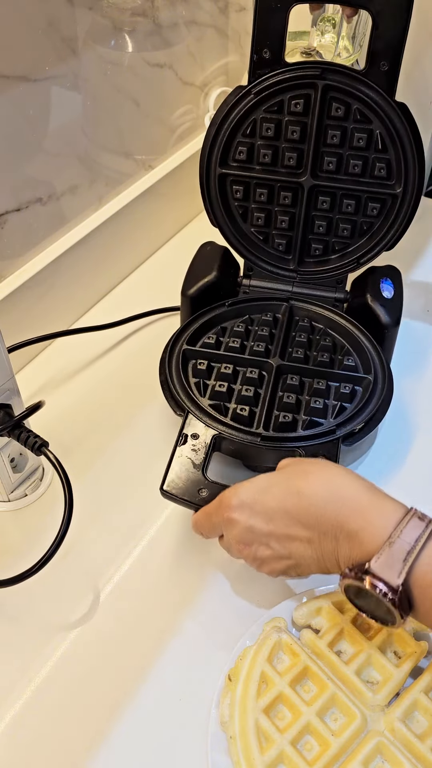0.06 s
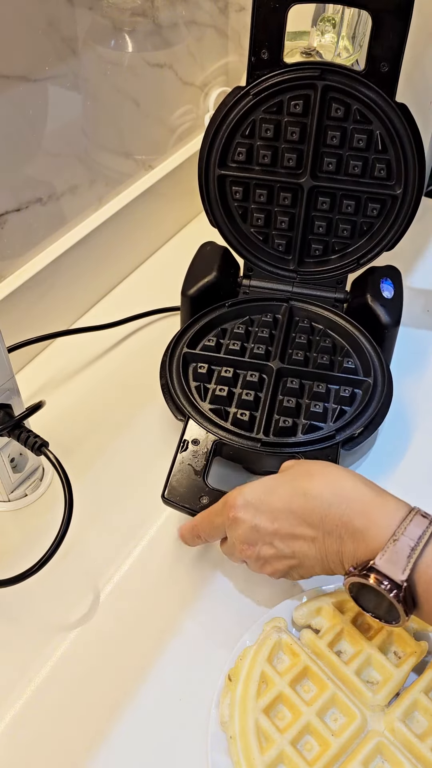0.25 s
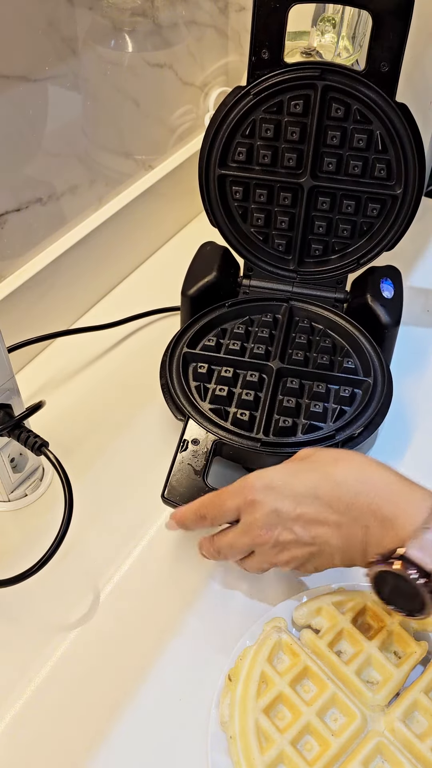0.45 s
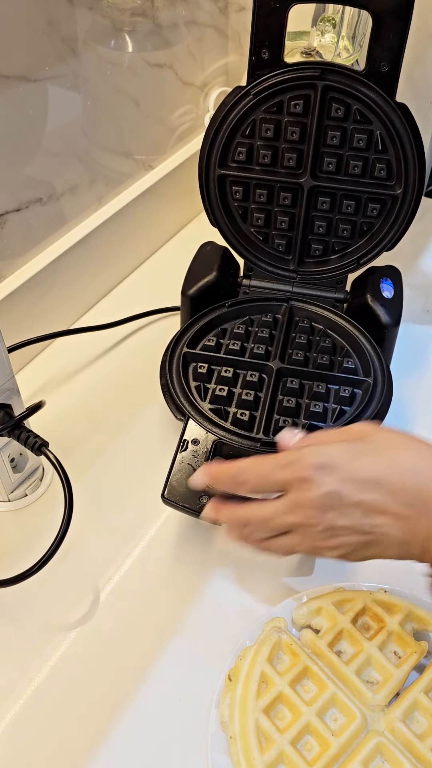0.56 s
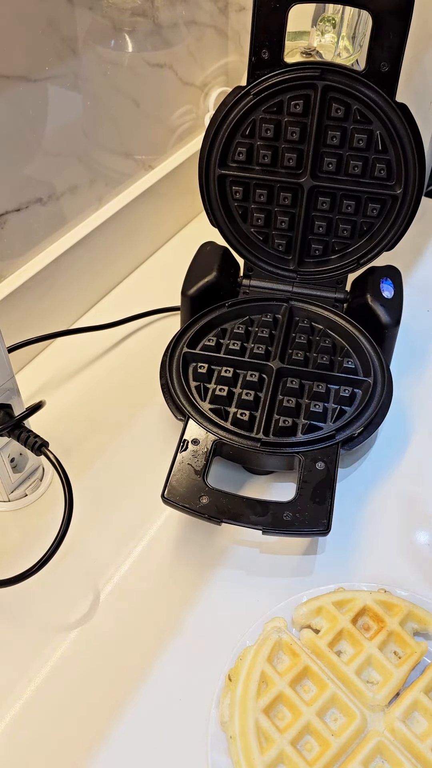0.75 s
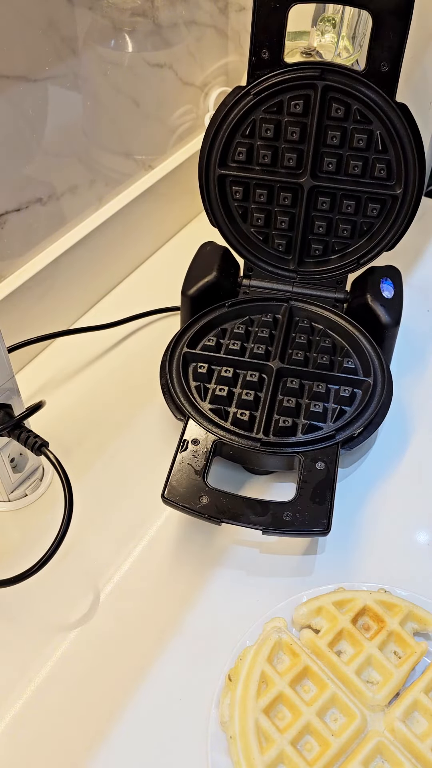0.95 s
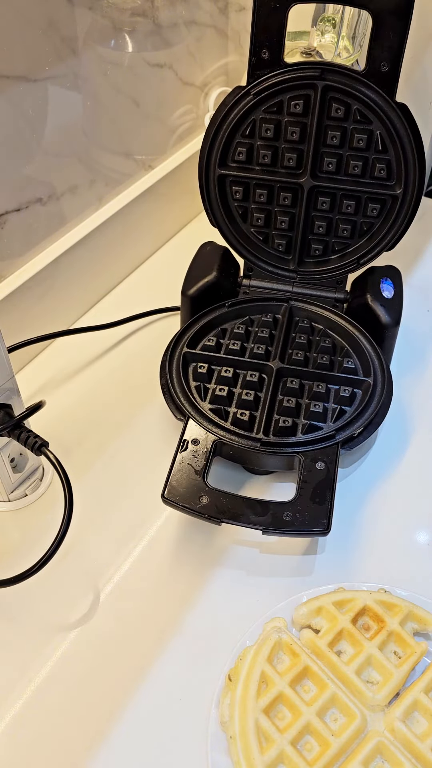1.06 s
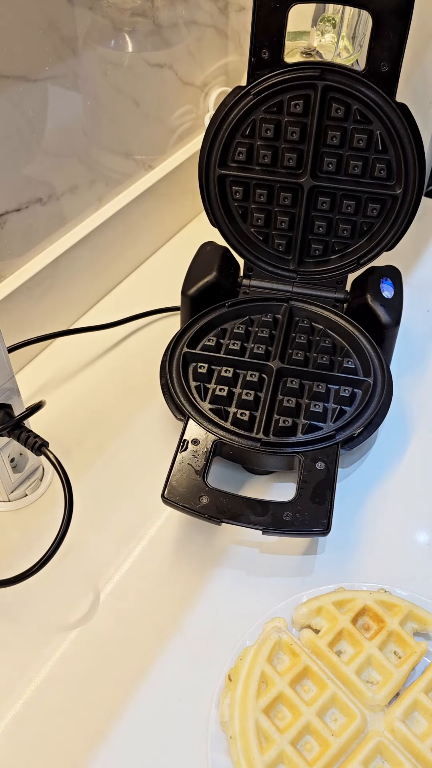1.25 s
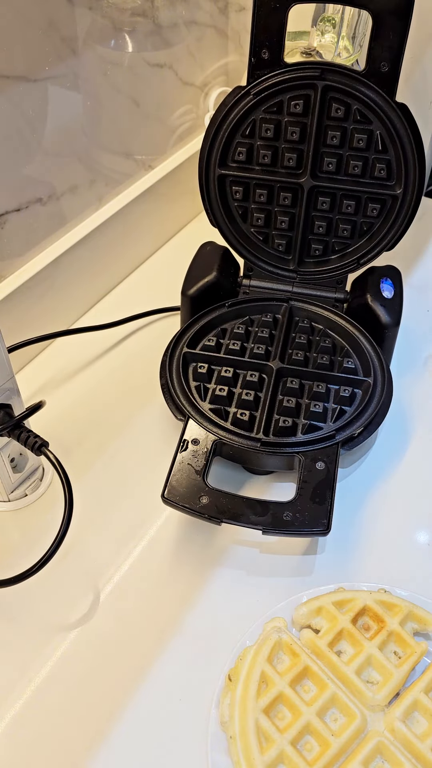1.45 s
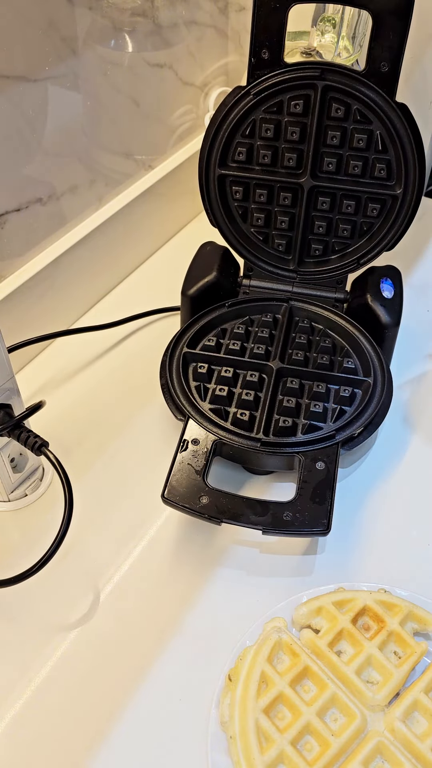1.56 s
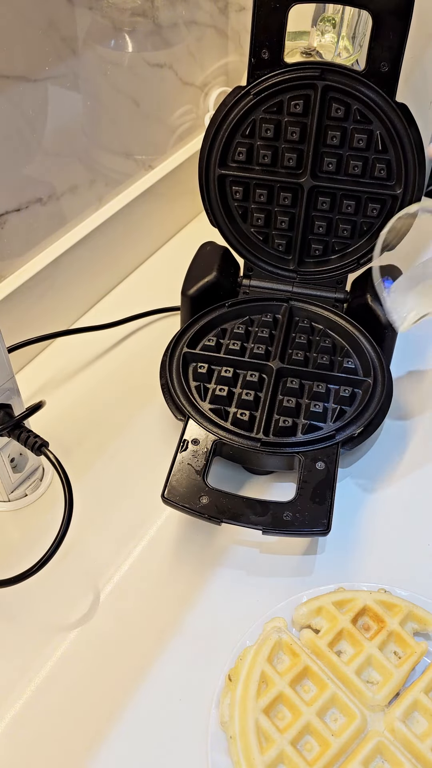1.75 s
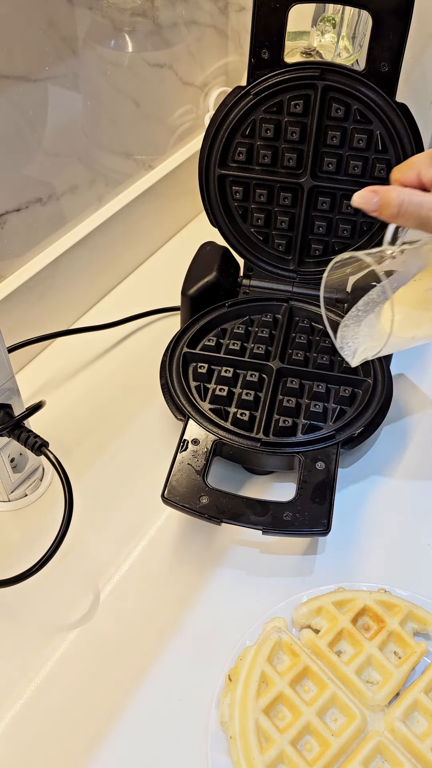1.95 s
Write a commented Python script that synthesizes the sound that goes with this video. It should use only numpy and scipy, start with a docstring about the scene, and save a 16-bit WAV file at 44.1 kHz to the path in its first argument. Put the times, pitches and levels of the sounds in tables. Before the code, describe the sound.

A waffle maker turns against its stop with one loud plastic clunk, then its handle snaps and settles in softer clicks; faint scuffs and squeaks follow over low hum in a small hard kitchen, closely miked.

```python
"""A low hum and room tone run throughout a small hard kitchen. An open waffle maker is knocked, its handle clicks,
then it is turned against its stop with a loud plastic clunk: low housing modes, short stop rings and noise cracks.
The handle clicks again and settles: snaps of noise with short damped modes. Dull bumps lie under the whole scene.
Afterwards something is scuffed along the counter (grainy noise) and squeaks faintly (narrow noise bands)."""
import sys
import numpy as np
from scipy import signal
from scipy.fft import rfft, irfft
from scipy.io import wavfile

SR = 44100
rng = np.random.default_rng(int(sys.argv[2]) if len(sys.argv) > 2 else 0)


def store_pcm(level_fs):
    """Save levels as 16-bit WAV."""
    pcm = np.round(np.clip(level_fs, -1, 1) * 32767).astype(np.int16)
    wavfile.write(sys.argv[1], SR, np.atleast_2d(pcm).T)


N = 88200
T = np.arange(N) / SR  # time axis, s

# quick run of contacts between plate and stop: [t/s, relative level/dB]
STOP_CONTACTS = [(0.2036, 1.5), (0.2047, -7.5), (0.2062, -3)]
# colour of the crack at the stop: [f/Hz, relative level per Hz/dB]
CRACK_COLOUR = [(300, 8.5), (1000, 2.5), (2400, 0), (3200, -4.5), (6500, -10.5), (9000, -18.5),
                (12000, -25), (16000, -37)]


def from_db(db):
    """Decibels to an amplitude factor."""
    return 10 ** (np.asarray(db) / 20)


def rms_one(x):
    """Scales a sound to rms 1."""
    return x / np.sqrt(np.mean(x ** 2) + 1e-20)


def at_hz(points, hz):
    """Reads a table on a log-frequency axis."""
    f, value = np.transpose(points)
    return np.interp(np.log(hz + 1e-9), np.log(f), value)


def pan(db):
    """Left and right gains that differ by db; positive leans left."""
    return from_db([[db / 2], [-db / 2]])


def delay(x, s):
    """The same sound, s seconds later."""
    return np.interp(T - s, T, x, left=0)


def left_first(x, lag_s):
    """The sound reaches the left microphone first, the right one lag_s later."""
    return np.array([x, delay(x, lag_s)])


def decay(age, t60):
    """Exponential fall by 60 dB in t60 seconds; full level before age 0."""
    return np.exp(-np.log(1000) * np.maximum(age, 0) / t60)


def swell(s, rise, t60):
    """A linear rise from time s and an exponential fall."""
    return np.clip((T - s) / rise, 0, 1) * decay(T - s - rise, t60)


def ring(s, hz, t60):
    """A mode struck at time s: a sine that dies exponentially."""
    age = np.maximum(T - s, 0)
    return np.sin(2 * np.pi * hz * age) * decay(age, t60)


def drift(rate):
    """Slow random wandering with rms 1: white noise through two equal low-pass poles at rate Hz."""
    r = np.exp(-2 * np.pi * rate / SR)
    wander = signal.lfilter([1], [1, -2 * r, r * r], rng.standard_normal(2 * N))
    return rms_one(wander[N:])  # the first half lets the filter settle


def noise(spectrum):
    """Coloured stereo noise, alike in the bass and diffuse in the treble; rms 1."""
    # how alike left and right are: [f/Hz, correlation]
    likeness = [(50, 1), (150, 0.9), (300, 0.77), (600, 0.37), (2000, 0.1), (12000, 0.033)]
    hz = np.arange(N // 2 + 1) * SR / N
    mid, side = rfft(rng.standard_normal((2, N)))
    alike = np.clip(at_hz(likeness, hz), -1, 1)
    both = np.sqrt(1 + alike) * mid + np.sqrt(1 - alike) * side * [[1], [-1]]
    coloured = both * from_db(at_hz(spectrum, hz)) * (hz > 15)
    return rms_one(irfft(coloured, N))


def band(x, low_hz, high_hz):
    """A band-pass made from a second-order Butterworth design."""
    sos = signal.butter(2, [low_hz, min(high_hz, SR / 2 - 1)], "band", fs=SR, output="sos")
    return signal.sosfilt(sos, x)


def room_tone():
    """Steadily coloured noise whose level moves slowly."""
    # colour of the room tone: [f/Hz, relative level per Hz/dB]
    colour = [(20, -2.5), (55, 6), (80, -0.5), (125, -8), (200, -17), (300, -21), (560, -19.5),
              (800, -28.5), (1700, -27.5), (2700, -35), (6500, -41.5), (9300, -46), (11500, -39),
              (16000, -42.5)]
    # its level before panning: [t/s, level/dB]
    level_db = [(0, -40), (.2, -35.5), (.45, -43), (.85, -41), (1.2, -41), (2, -43)]
    return from_db(np.interp(T, *np.transpose(level_db))) * noise(colour) * pan(2.5)


def hum():
    """A low hum of wavering pitch and level, and a steady-pitched upper line that partly follows its level."""
    # level of the low hum: [t/s, level/dB]
    hum_level = [(0, -34), (.2, -37.5), (.3, -66), (.5, -33), (.58, -45), (.64, -31.5), (.76, -38.5),
                 (.85, -33), (1.0, -36), (1.17, -30), (1.36, -28.5), (1.48, -43.5), (1.55, -31.5),
                 (1.65, -52), (1.72, -47), (2, -46.5)]
    low_hz, waver_hz = 46.3, 2.17  # mean pitch and rms pitch waver
    upper_hz, upper_mean_db, upper_waver_db = 118.2, -49, 3
    follows = 0.48  # share of the low hum's dB movement
    low_db = np.interp(T, *np.transpose(hum_level))
    phase = 2 * np.pi * np.cumsum(low_hz + waver_hz * drift(7.8)) / SR
    low = from_db(low_db) * rms_one(np.sin(phase))
    upper_db = upper_mean_db + follows * (low_db - low_db.mean()) + upper_waver_db * drift(24)
    upper = from_db(upper_db) * np.sin(2 * np.pi * upper_hz * T)
    return low + upper


def kitchen(x):
    """Convolves with a noise burst for early reflections off counter and wall, and a tail that dies band by band."""
    # reverberation time: [f/Hz, t60/s]
    room_t60 = [(100, 1), (300, 0.86), (1000, 0.65), (3000, 0.57), (6000, 0.51), (12000, 0.49)]
    # colour of the reflections: [f/Hz, relative level/dB]
    colour = [(100, -6.5), (300, -8), (650, 1), (1000, 0.5), (2000, -3), (3500, -1.5), (7000, -6),
              (14000, -3.5)]
    tail_db, early_db, early_t60_s = -8.5, -8.5, 0.1
    edges = np.geomspace(70, 18000, 13)  # band edges, Hz
    diffuse = noise(colour)
    tail = 0
    for low, high in zip(edges, edges[1:]):
        t60 = at_hz(room_t60, np.sqrt(low * high))
        tail = tail + band(diffuse, low, high) * swell(0.001, 0.0039, t60)
    early = noise(colour) * swell(0.0014, 0.0021, early_t60_s)
    response = from_db(tail_db) * rms_one(tail) + from_db(early_db) * rms_one(early)
    response = response / np.sqrt(N)  # rms 1 becomes energy 1
    return signal.fftconvolve(x, response, axes=1)[:, :N]


def grainy_noise(events, spectrum, grain_db):
    """Noise that swells and dies, roughened by random level changes of grain_db rms."""
    level = sum(from_db(db) * swell(s, rise, t60) for s, db, rise, t60 in events)
    return level * rms_one(from_db(grain_db * drift(120)) * noise(spectrum))


def bumps():
    """Dull handling bumps: dark, grainy noise bursts."""
    # the bumps: [t/s, level/dB, rise/s, t60/s]
    events = [(0.0, -35, 0.00067, 0.32), (0.43, -41.5, 0.005, 0.46), (1.07, -58, 0.01, 0.73),
              (1.222, -44.5, 0.0092, 0.37), (1.46, -56.5, 0.042, 0.28), (1.72, -81, 0.0062, .2),
              (1.93, -70, 0.023, .15)]
    # their colour: [f/Hz, relative level per Hz/dB]
    colour = [(100, 1), (300, 5), (580, 11.5), (900, 1.5), (1800, -6.5), (4000, -17), (16000, -36)]
    return grainy_noise(events, colour, grain_db=-3.5)  # the sign only mirrors the random grain


def scuffs():
    """Friction along the counter: grainy noise strokes."""
    # the scuffs, before panning: [t/s, level/dB, rise/s, t60/s]
    events = [(0.95, -45.5, 0.045, 0.31), (0.988, -42.5, 0.013, 0.37), (1.045, -50.5, 0.011, 0.36)]
    # their colour: [f/Hz, relative level per Hz/dB]
    colour = [(120, 10), (220, 4.5), (480, 1), (720, -3), (900, 3.5), (1300, -3), (3000, -4), (5500, -7),
              (9000, -12), (16000, -14)]
    return grainy_noise(events, colour, grain_db=1.5) * pan(0.5)


def squeaks():
    """Friction drives one narrow resonance for a moment: band-passed noise that holds, then dies."""
    # faint rubs and squeaks: [t/s, time from onset to fall/s, f/Hz, width/Hz, level/dB]
    events = [(0.921, 0.11, 3100, 700, -55), (1.067, 0.035, 940, 160, -55.5),
              (1.125, 0.013, 618, 112, -47.5), (1.527, 0.051, 553, 140, -57),
              (1.714, .06, 4080, 195, -65.5), (1.792, 0.055, 2154, 257, -51),
              (1.842, .02, 9400, 3040, -60.5), (1.886, 0.035, 3650, 710, -63)]
    rise_s, t60_s = 0.0057, 0.51
    out = 0
    for s, length, hz, width, db in events:
        level = np.clip((T - s) / rise_s, 0, 1) * decay(T - s - length, t60_s)
        friction = band(rng.standard_normal((2, N)), hz - width / 2, hz + width / 2)
        out = out + from_db(db) * level * rms_one(friction)
    return out


def handle():
    """Each click is a snap and the handle's damped modes; softer touches lose their treble."""
    # clicks of the plastic handle: [t/s, relative level/dB, left-right/dB, low-pass/Hz]
    clicks = [(0.074, -22, 2, 3000), (0.178, -18.5, -1, 3500), (0.3783, -1, 2, 15000),
              (0.3815, -3, 1, 5000), (0.394, -15, 0, 5000), (0.4425, -10, 0, 2300), (0.487, -19, 0, 2500),
              (0.5197, -15, -1, 2200)]
    # modes of the handle: [f/Hz, mean relative level/dB, t60/s]
    modes = [(1675, -19, 0.043), (1957, -24, 0.03), (2097, -19, 0.021), (2270, -37, 0.051),
             (2930, -17.5, 0.026), (3200, -20, 0.019), (3290, -53, 0.8), (4190, -23, 0.023),
             (5270, -35, 0.017), (6130, -37, .02)]
    # colour of the snap: [f/Hz, relative level per Hz/dB]
    snap_colour = [(300, 5.5), (1000, 4), (1700, 5.5), (3200, -6.5), (6000, -11.5), (9000, -21.5),
                   (13000, -26.5), (16000, -32)]
    snap_db, snap_t60_s, lag_s, low_cut_hz = -18.5, 0.039, 0.00015, 1400
    out = 0
    for s, db, pan_db, bright_hz in clicks:
        rings = 0
        for k, (hz, mode_db, t60) in enumerate(modes):
            gain = from_db(mode_db + rng.normal(0, 1.5))  # every click excites the modes a little differently
            rings = rings + gain * (-1) ** k * ring(s, hz, t60)
        snap = from_db(snap_db) * swell(s, 0.00032, snap_t60_s) * noise(snap_colour)
        softness = signal.butter(2, min(bright_hz, SR / 2 - 1), fs=SR, output="sos")
        click = signal.sosfilt(softness, left_first(rings, lag_s) + snap)
        out = out + from_db(db) * pan(pan_db) * click
    low_cut = signal.butter(4, low_cut_hz, "high", fs=SR, output="sos")
    return signal.sosfilt(low_cut, out)


def housing():
    """Knocks swell into the low modes of the housing on the counter."""
    # knocks: [t/s, relative level/dB]
    knocks = [(0.0, -25), (0.2035, -0.5), (0.383, -27.5)]
    # modes of the housing: [f/Hz, relative level/dB, t60/s, left-right/dB]
    modes = [(122.8, -3.5, 0.18, 1), (121.4, -22.5, 0.56, -6), (218.6, -4, 0.1, 3),
             (206.6, -16.5, 0.247, 4), (169.5, -24.5, 0.4, 5), (292.3, -37, 1, -4), (352, -5, 0.091, 11),
             (450, -12.5, 0.051, 13), (636, -4.5, 0.033, 10), (680.5, -38.5, 0.97, 13),
             (938.5, -19.5, 0.1, -10), (1052, -18.5, 0.097, 3), (1370, -43, 0.12, 19),
             (1567, -28, 0.15, 11.5), (2140, -38, .2, -3.5), (2170, -37, 0.1, -6)]
    swell_s, lag_s = 0.01, 0.00017
    out = 0
    for s, db in knocks:
        onset = 1 - np.exp(-((T - s) / swell_s) ** 2)
        for hz, mode_db, t60, pan_db in modes:
            out = out + from_db(db + mode_db) * pan(pan_db) * ring(s, hz, t60) * onset
    left, right = out
    return np.array([left, delay(right, lag_s)])


def stop_rings():
    """The first contact sets the stop ringing briefly in damped modes."""
    # short rings of the stop: [f/Hz, level/dB, t60/s, left-right/dB]
    modes = [(780, -6.5, 0.0097, -8), (1000, -7, 0.013, -4), (1395, -8, 0.017, 2.5),
             (2064, -6.5, 0.0089, -3.5), (2398, -5.5, 0.013, 5.5), (3370, -45, 0.0034, 9),
             (4390, -18, 0.0099, 18), (5200, -22.5, .01, 7), (6650, -19.5, 0.0085, -6)]
    s = STOP_CONTACTS[0][0]
    onset = np.clip((T - s) / 0.00064, 0, 1)
    out = 0
    for k, (hz, db, t60, pan_db) in enumerate(modes):
        out = out + from_db(db) * (-1) ** k * pan(pan_db) * onset * ring(s, hz, t60)
    return out


def stop_crack():
    """Each contact with the stop is a broad, short crack of noise."""
    crack_db, t60_s = -10, 0.012
    out = 0
    for s, db in STOP_CONTACTS:
        out = out + from_db(db + crack_db) * swell(s, 2 / SR, t60_s) * noise(CRACK_COLOUR)
    return pan(5) * out


def crack_into_room():
    """The crack reaches the walls as one broad pulse, at the first contact."""
    hz = np.arange(N // 2 + 1) * SR / N
    shift = np.exp(-2j * np.pi * hz * STOP_CONTACTS[0][0])
    pulse = irfft(from_db(at_hz(CRACK_COLOUR, hz)) * shift, N)
    return rms_one(pulse) / np.sqrt(N)  # energy 1


def scene():
    """The waffle maker in its room, with handling noises, hum and room tone."""
    body, rings, crack, clicks = housing(), stop_rings(), stop_crack(), handle()
    # sends into the room, dB
    send = from_db(-3.5) * body + from_db(-7.5) * rings + from_db(15.5) * crack_into_room() + clicks
    handling = scuffs() + bumps() + squeaks()
    background = hum() + room_tone()
    return body + rings + crack + clicks + kitchen(send) + handling + background


def record(dry):
    """The loudest peaks overload softly; a steep low-pass cuts the top by 60 dB from 16600 Hz."""
    clipped = dry / (1 + dry ** 8) ** (1 / 8)
    return signal.sosfilt(signal.cheby2(16, 60, 16600, fs=SR, output="sos"), clipped)


dry = scene()
out = record(dry)
store_pcm(out)
```